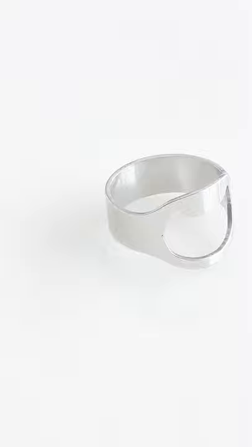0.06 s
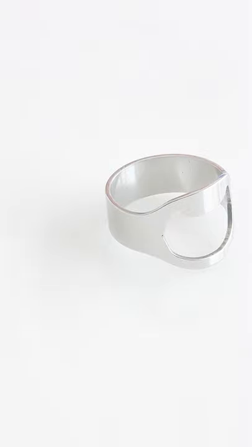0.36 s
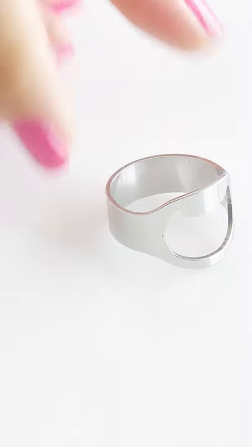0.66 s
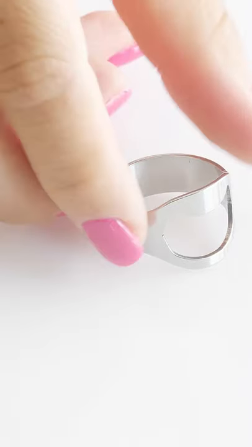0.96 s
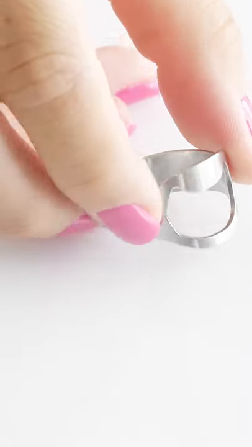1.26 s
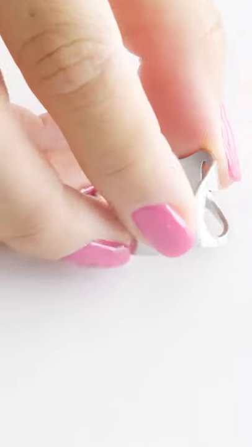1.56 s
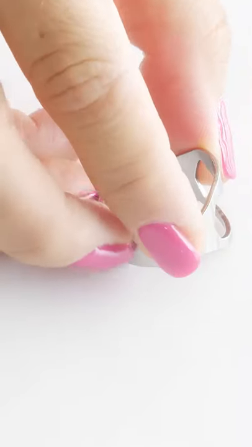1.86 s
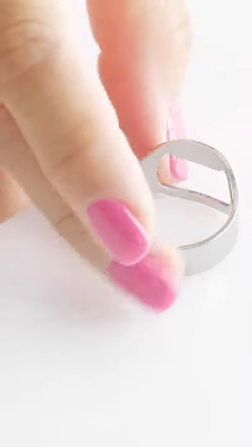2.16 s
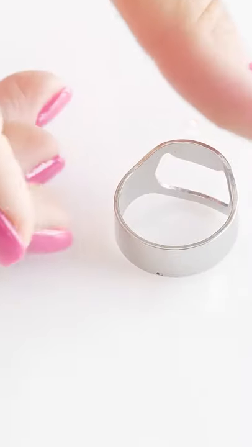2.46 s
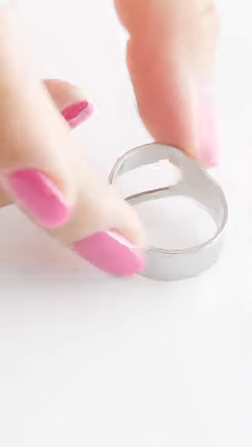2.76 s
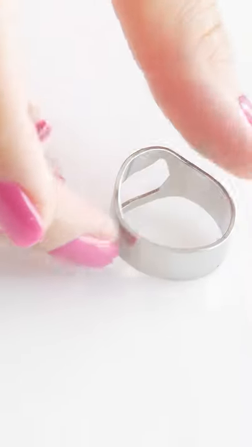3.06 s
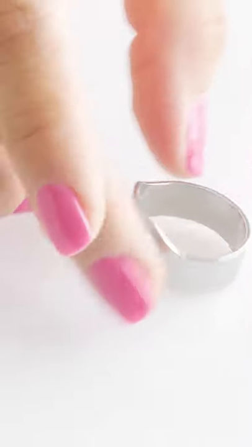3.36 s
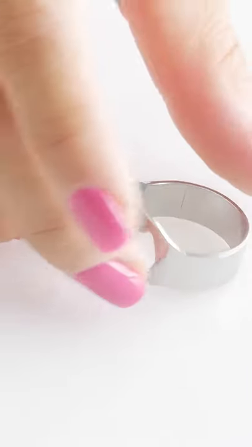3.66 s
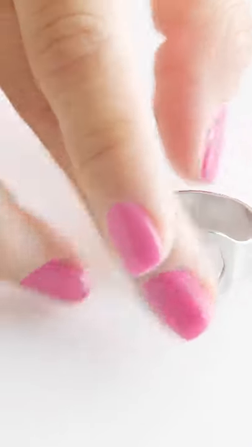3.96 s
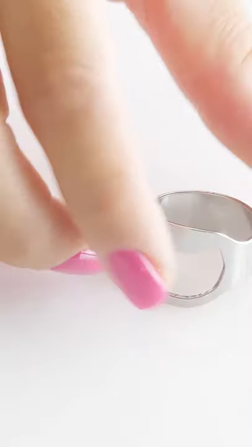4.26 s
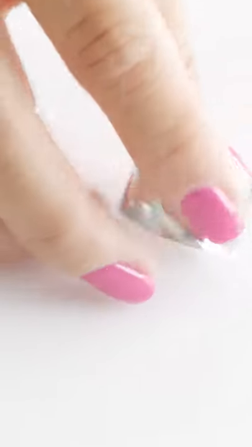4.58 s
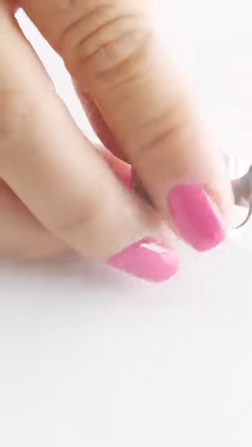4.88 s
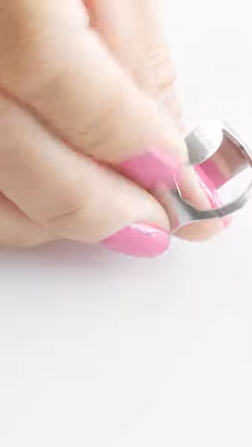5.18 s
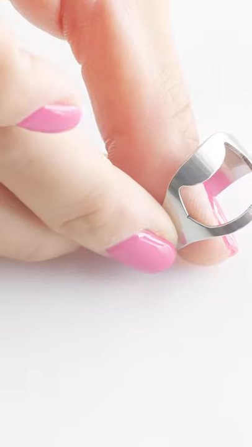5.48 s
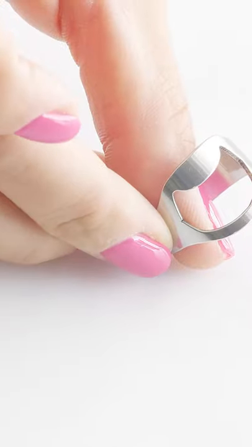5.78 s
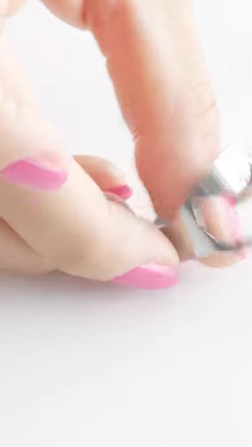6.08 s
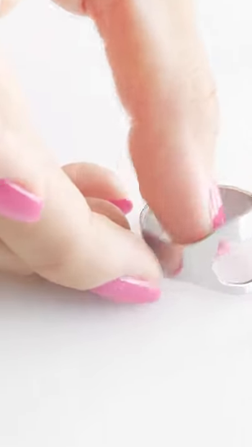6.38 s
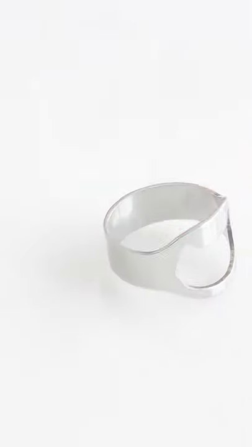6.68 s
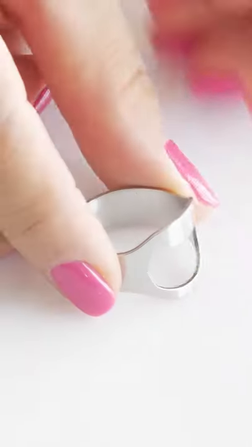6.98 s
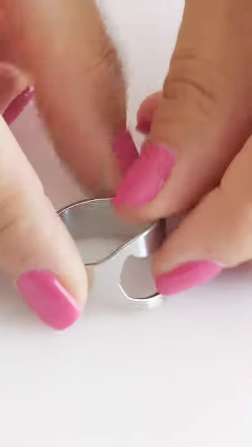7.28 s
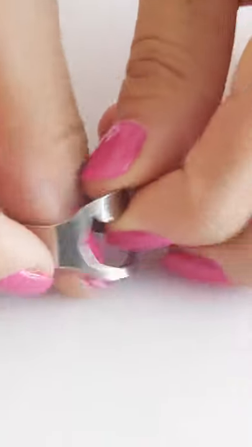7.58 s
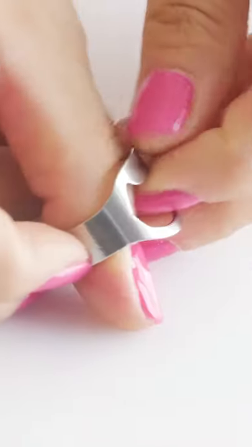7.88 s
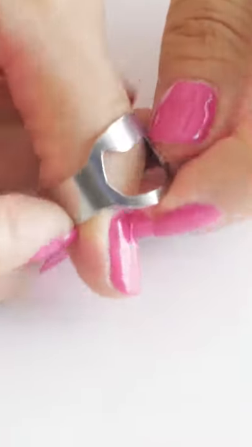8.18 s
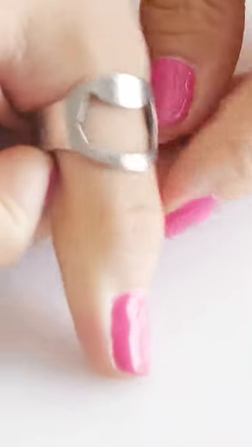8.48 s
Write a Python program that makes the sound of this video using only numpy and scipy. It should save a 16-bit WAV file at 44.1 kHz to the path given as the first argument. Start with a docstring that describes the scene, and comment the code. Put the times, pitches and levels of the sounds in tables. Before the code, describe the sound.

In a small room, close to a hard table, a steel ring is nudged about with scattered light knocks and faint scrapes. It rocks from edge to edge in quick runs of taps, knocks a few times more loudly, then drops with a short, bright clatter and wobbles. Fingernails click against it at the end, with soft bumps of the hands, over a faint low hum.

```python
"""A small room, close to a hard table top, where a steel ring is nudged about and rocks from edge to edge.
It is tipped up, knocks, drops flat with a short clatter, then is pushed onto a finger with nail clicks
and soft bumps of the hand. Knocks and scrapes sound through bending waves in the table; the steel adds
a brief, bright ring and skin a soft hiss. A low hum, faint whines and room noise lie beneath."""
import sys
import numpy as np
from scipy import signal
from scipy.fft import rfft, irfft
from scipy.io import wavfile

SR = 44100
rng = np.random.default_rng(int(sys.argv[2]) if len(sys.argv) > 2 else 0)


def inscribe(sig):
    """Save sig as 16-bit PCM at rate SR to the path in sys.argv[1].

    A 1-D sig is mono; a 2-D sig holds one channel per row.
    Samples are clipped to [-1, 1] before scaling.
    """
    pcm = np.round(np.clip(np.atleast_2d(sig).T, -1, 1) * 32767)
    wavfile.write(sys.argv[1], SR, pcm.astype(np.int16))


N = 381024
TIME = np.arange(N) / SR

# the ring hits the table: (time [s], blow [dB], hardness as corner [Hz], resonance of the spot [Hz],
# free ringing of the steel [dB re blow])
RING_HITS = [(1.2585, -16.5, 2260, 1410, -40), (1.3897, -11, 2620, 1080, -40),
             (1.7244, -10, 3600, 1270, -40), (1.9886, -6.5, 3590, 950, -40), (2.6727, -11, 2608, 1510, -40),
             (3.416, -7, 1810, 1480, -40), (3.8280, -9, 2180, 990, -40), (3.9698, -24, 1806, 1305, -40),
             (4.4433, -8, 2007, 1043, -40), (4.8432, -15.5, 1500, 936, -23), (5.045, 6.5, 4200, 1663, -42),
             (5.1378, 1.5, 2330, 1440, -42), (5.297, 8.5, 2550, 1430, -40), (6.1763, 11, 4380, 1332, -11),
             (6.1914, 4.5, 4100, 1560, -27), (6.2029, 3, 4300, 950, -9), (6.2117, -4.5, 5500, 1350, 5),
             (6.223, 14, 15200, 1130, -2.5), (6.231, -1, 6000, 2530, -7), (6.2408, -16, 12000, 7900, -17),
             (6.2427, -15, 9000, 1310, -30), (6.2519, -4, 9900, 1300, -16), (7.0518, -11, 3000, 1020, -40),
             (7.7373, -11.5, 2604, 1220, -44), (8.1574, -14.5, 1560, 755, -34),
             (8.4215, -13.5, 1670, 1150, -45)]


def undb(db):
    """Decibels to gain."""
    return 10 ** (np.asarray(db) / 20)


def unit(x):
    """Scale to rms 1."""
    return x / np.std(x)


def add(track, s, sound):
    """Mix a sound into a track at time s."""
    i = int(s * SR)
    track[i:i + len(sound)] += sound[:N - i]


def through(x, response):
    """Pass a track through an impulse response."""
    return signal.fftconvolve(x, response)[:N]


def band(x, lo_hz, hi_hz, order=2):
    """Causal band-pass."""
    sos = signal.butter(order, [lo_hz, min(hi_hz, .45 * SR)], "band", fs=SR, output="sos")
    return signal.sosfilt(sos, x)


def noise(spectrum):
    """Noise of rms 1, coloured by (frequency [Hz], level [dB]) points."""
    hz, db = np.transpose(spectrum)
    bins = np.maximum(np.arange(N // 2 + 1) * SR / N, 1)
    colour = undb(np.interp(np.log(bins), np.log(hz), db))
    return unit(irfft(rfft(rng.standard_normal(N)) * colour, N))


def swell(s, half_s, db):
    """Bell-shaped envelope centred on time s."""
    return undb(db) * np.exp(-.5 * ((TIME - s) / half_s) ** 2)


def ring_down(modes):
    """Struck modes die away as damped sines."""
    t = np.arange(SR // 3) / SR
    return sum(undb(db) * np.sin(2 * np.pi * hz * t) * np.exp(-np.log(1000) * t / t60)
               for hz, db, t60 in modes)


def contact(db, corner_hz):
    """Force pulse of one contact: the softer it is, the longer it lasts."""
    k = np.arange(1, 257)
    force = k * np.exp(-2 * np.pi * corner_hz * k / SR)
    return undb(db) * force / force.sum()


def spot(force, hz, boost_db, width_hz):
    """Where a blow lands decides which of the table's modes it favours."""
    force = np.pad(force, (0, SR // 40))
    favoured = band(force, max(hz - width_hz / 2, 100), hz + width_hz / 2, order=1)
    return force + undb(boost_db) * favoured


def room_tone(flutter_db=2, octave_db=-14, waver_hz=4, low_db=-62, air_db=-55.5):
    """The bed: a wavering hum with its octave, thin whines, low room noise and hiss."""
    # the hum's wandering course: (time [s], pitch [Hz], level [dB])
    hum_course = [(0.1, 66.1, -56), (0.21, 64.4, -49), (1.03, 69.5, -54.5), (1.18, 72.6, -57),
                  (1.21, 75.2, -71), (1.41, 74, -50.5), (1.53, 75.3, -58.5), (1.96, 74.6, -48.5),
                  (2.11, 77.6, -71), (2.15, 77.4, -52.5), (2.36, 76.5, -49.5), (2.56, 78.5, -66),
                  (2.61, 77.8, -51), (3.61, 78.8, -55), (3.71, 78.6, -64), (3.83, 76.2, -50),
                  (3.98, 73.9, -67), (4.0, 74.7, -53.5), (4.87, 74.8, -58.5), (4.95, 74.5, -56),
                  (5.5, 77.5, -53), (5.88, 76, -64), (6.7, 75.5, -57.5), (7.1, 75, -62)]
    # faint whines: (pitch [Hz], level [dB])
    whine_tones = [(576.0, -72), (2789, -71), (2934, -78.5)]
    # colour of the room noise and hiss: (frequency [Hz], relative density [dB])
    air_colour = [(60, -12), (110, -23), (145, -3.5), (200, -8), (300, -12), (450, -14.5), (700, -15.5),
                  (880, -13.5), (1100, -19.5), (1600, -21.5), (3400, -22.5), (8000, -24.5), (13000, -28),
                  (16000, -33.5)]
    s, hz, db = np.transpose(hum_course)
    flutter = flutter_db * unit(band(rng.standard_normal(N), 1.5, 6.2))
    phase = 2 * np.pi * np.cumsum(np.interp(TIME, s, hz)) / SR
    hum_level = np.sqrt(2) * undb(flutter + np.interp(TIME, s, db))
    hum = hum_level * (np.sin(phase) + undb(octave_db) * np.sin(2 * phase))
    whines = 0
    for hz, db in whine_tones:
        drift = waver_hz * unit(band(rng.standard_normal(N), 1, 5.7, order=1))
        whines += np.sqrt(2) * undb(db) * np.sin(2 * np.pi * np.cumsum(hz + drift) / SR)
    low = undb(low_db) * unit(band(rng.standard_normal(N), 42, 139))
    return hum + whines + low + undb(air_db) * noise(air_colour)


def swells_and_rubs(spread=1.5):
    """Faint hisses and a soft, low swell of room noise near the start; later, skin rubs steel and table."""
    # swells of band noise: (mid time [s], half length [s], level [dB], band centre [Hz])
    swells = [(0.163, 0.014, -50.5, 8100), (0.164, 0.022, -54, 3960), (0.36, 0.14, -62, 270),
              (0.446, 0.022, -60.5, 4940), (2.065, 0.037, -56.5, 320), (2.842, 0.022, -55, 350),
              (4.892, 0.13, -58, 4000), (5.244, 0.3, -61, 7780), (6.132, 0.0035, -50.5, 3456),
              (6.956, 0.021, -56.5, 6204), (6.966, 0.014, -49, 338), (7.189, 0.013, -49.5, 400),
              (7.32, 0.026, -61, 5970), (7.667, 0.056, -54.5, 382.5), (7.897, 0.053, -66, 6440),
              (8.44, 0.028, -50, 400)]
    grit = rng.standard_normal(N)
    return sum(unit(band(grit, hz / spread, hz * spread)) * swell(s, half_s, db)
               for s, half_s, db, hz in swells)


def table_response(size=16384):
    """The top is a plate: low bending waves travel slower, so each arrival is a quick downward chirp."""
    # how the top radiates a sharp blow: (frequency [Hz], relative level [dB])
    radiation = [(60, -52), (240, -4), (330, -9), (480, -4), (750, -2), (1000, -1), (1600, 1), (2500, 0),
                 (3800, 3), (6000, 0), (7000, -2), (8200, 0.5), (9800, -4), (11700, -1), (16000, -11.5)]
    # bending waves, direct and back from the edges:
    # (travel time at 1 kHz [s], relative level [dB], treble loss corner [Hz])
    wave_paths = [(.0008, 0, 30000), (.0025, -6, 4500), (.0043, 0, 3600), (.0088, -11, 2600),
                  (.014, -20, 1800)]
    # standing waves of the top: (frequency [Hz], relative level [dB], t60 [s])
    top_modes = [(597.3, -38, 0.15), (725, -64, 0.024), (913.4, -33, 0.06), (1097, -34.5, 0.12),
                 (1470, -38, 0.036), (2360, -42, 0.065), (2717, -40, 0.11)]
    hz = np.maximum(np.arange(size // 2 + 1) * SR / size, 1)
    points_hz, db = np.transpose(radiation)
    cepstrum = irfft(np.log(undb(np.interp(np.log(hz), np.log(points_hz), db))))
    colour = np.exp(rfft(np.r_[cepstrum[0], 2 * cepstrum[1:size // 2]], size))  # minimum phase
    waves = 0
    for travel_s, path_db, loss_hz in wave_paths:
        phase = 4 * np.pi * travel_s * np.sqrt(1000 * hz)
        waves += undb(path_db) * np.exp(-1j * phase) / (1 + (hz / loss_hz) ** 2)
    standing = 1 + 1j * rfft(ring_down(top_modes), size)
    response = irfft(colour * waves * standing)[:size // 2]
    return response / np.linalg.norm(response)


def rim_scrapes(table, grain_db=3.0, grain_samples=32):
    """Dense tiny slips of the rim shake the table top."""
    # the rim drags: (mid time [s], half length [s], level [dB])
    drags = [(1.098, 0.0058, -52.5), (1.553, 0.026, -59), (1.993, 0.0051, -43), (2.214, 0.032, -61),
             (2.672, 0.011, -42), (2.857, 0.022, -52), (3.346, 0.034, -53.5), (3.523, 0.0055, -44),
             (3.959, 0.015, -49), (4.509, 0.0054, -53), (4.656, 0.04, -54), (7.2, .025, -62),
             (7.455, 0.0095, -50.5), (7.916, 0.0031, -44.5)]
    roughness = np.repeat(rng.exponential(size=N // grain_samples + 1), grain_samples)[:N]
    slips = rng.standard_normal(N) * undb(grain_db * roughness)
    scraping = unit(through(band(slips, 770, 1540, order=1), table))
    return scraping * sum(swell(*drag) for drag in drags)


def ring_strikes(table):
    """Each blow knocks on the table; the steel rings out briefly when the fingers let it go."""
    # bending modes of the ring: (frequency [Hz], relative level [dB], t60 [s])
    steel_modes = [(4847, -33.5, 0.074), (6210, -29, 0.016), (11680, -45, .05), (13080, -53, 0.16),
                   (13200, -47, .06)]
    on_table, on_steel = np.zeros(N), np.zeros(N)
    lags = rng.uniform(0, 0.00027, len(RING_HITS))  # blows catch the ringing steel at a chance phase
    for (s, db, corner_hz, spot_hz, free_db), lag in zip(RING_HITS, lags):
        add(on_table, s, spot(contact(db, corner_hz), spot_hz, boost_db=-1, width_hz=450))
        add(on_steel, s + lag, contact(db + free_db, corner_hz=18000))
    return through(on_table, table) + through(on_steel, ring_down(steel_modes))


def table_thumps(share_db=-44):
    """A share of every blow makes the whole table sway with a low thump."""
    # sway of the table: (frequency [Hz], relative level [dB], t60 [s])
    sway_modes = [(37.6, -1.5, 0.25), (60, 3.5, 0.18), (107.4, -9, 0.25), (140, -22, 0.37)]
    force = np.zeros(N)
    for s, db, *_ in RING_HITS:
        add(force, s, contact(db + share_db, corner_hz=300))
    return through(force, ring_down(sway_modes))


def ring_rocking(table, usual_corner_hz=1900, rebound_gain=.35):
    """The two edges land in turn, the swings quickening; each ends in a soft tap and a tiny rebound."""
    # bouts of rocking: (start [s], end [s], taps [count], shortening per swing [s], second edge lag [s],
    # base level [dB], first spot [Hz], last spot [Hz], hardness corner of edge one [Hz], edge two [Hz])
    bouts = [(2.947, 3.166, 5, 0.00033, -.0039, -8.5, 1094, 993, 1890, 1940),
             (3.474, 3.815, 7, 0.00083, .00245, -8.5, 816, 1010, 2520, 2180),
             (4.048, 4.398, 8, 0.0003, .0003, -11.5, 1150, 1040, 2490, 1620),
             (6.468, 6.982, 10, 0.00024, 0.0032, -9, 970, 930, 1210, 1570)]
    force = np.zeros(N)
    for start_s, end_s, taps, quicken_s, late_s, db, first_hz, last_hz, *edges_hz in bouts:
        turns = np.arange(taps)
        uneven = late_s * (turns % 2) - quicken_s * turns ** 2 / 2
        times = np.linspace(start_s, end_s - uneven[-1], taps) + uneven
        for k, s, spot_hz in zip(turns, times, np.linspace(first_hz, last_hz, taps)):
            corner_hz = edges_hz[k % 2]
            fullness = (usual_corner_hz / corner_hz) ** 0.7  # the softer edge lands duller and fuller
            tap = contact(db, corner_hz) * fullness
            rebound_s = rng.uniform(.0012, .003)
            add(force, s, spot(tap, spot_hz, boost_db=7, width_hz=110))
            add(force, s + rebound_s, rebound_gain * tap)
    return through(band(force, 640, 4300), table)  # too light to stir the low modes


def nail_clicks(table, decay_s=0.00051):
    """A nail snaps over the rim: a bright click in the air, a dull knock into the table."""
    # nail on steel: (time [s], click peak [dB], knock [dB], knock hardness as corner [Hz])
    snaps = [(4.0618, -43, -11, 1500), (7.2893, -25, -9.5, 1495), (7.4489, -50, -11, 1216),
             (7.6388, -22.5, 4.5, 758), (7.875, -40, -10.5, 1510), (7.912, -29, -11, 1590),
             (8.0743, -43, -12.5, 1150), (8.4626, -34, -12, 996)]
    knocks, clicks = np.zeros(N), np.zeros(N)
    t = np.arange(SR // 100) / SR
    for s, click_db, knock_db, corner_hz in snaps:
        burst = rng.standard_normal(len(t)) * np.exp(-t / decay_s)
        click = band(burst, 1630, 6800, order=3)
        add(clicks, s, undb(click_db) * click / np.abs(click).max())
        add(knocks, s, contact(knock_db, corner_hz))
    return clicks + through(knocks, table)


def hand_bumps(attack_s=0.03, release_s=0.049, rest_from_s=7.17, rest_db=-55.5):
    """The weight of resting hands makes the table rumble; each press builds quickly and eases off."""
    # the hands press down as they shift: (time [s], level [dB])
    presses = [(7.19, -46.5), (7.5, -49), (7.65, -40.5), (7.96, -46), (8.09, -46), (8.41, -41.5),
               (8.5, -40)]
    # colour of the table's rumble: (frequency [Hz], relative density [dB])
    rumble_colour = [(13, -33), (22, 0), (43, -4.5), (81, -2), (146, -7), (178, -26), (300, -17),
                     (390, -64), (660, -120)]
    power = undb(rest_db) ** 2 * (TIME > rest_from_s)
    for s, db in presses:
        press = undb(db) * np.exp(-np.maximum((s - TIME) / attack_s, (TIME - s) / release_s))
        power += press ** 2
    return noise(rumble_colour) * np.sqrt(power)


def room_reverb(x, predelay_s=0.0007, build_s=0.018):
    """Diffuse echoes build up within milliseconds and die away soonest in the high treble."""
    # the small room's echoes: (band [Hz], level [dB], t60 [s])
    echo_bands = [(60.23, -15, 0.34), (198, 1, 0.41), (447, -0.5, 0.35), (980, -3.5, 0.39),
                  (2000, -6, 0.46), (3931, -7, 0.45), (7700, -12.5, 0.38), (15000, -25, 0.28)]
    t = np.arange(SR // 2) / SR
    hz, db, t60 = np.transpose(echo_bands)
    log_bins = np.log(np.maximum(np.arange(len(t) // 2 + 1) * SR / len(t), 1))
    white = rfft(rng.standard_normal(len(t)))
    onset = np.clip((t - predelay_s) / build_s, 0, 1)
    response = 0
    for k, share in enumerate(np.eye(len(hz))):
        fade = onset * np.exp(-np.log(1000) * t / t60[k])
        echoes = irfft(white * np.interp(log_bins, np.log(hz), share), len(t))
        response += undb(db[k]) * echoes * fade / np.linalg.norm(fade)
    return through(x, response)


def scene(rocking_send_db=-2):
    """Ring and nails play the one table top and the room answers; both channels carry the same mix."""
    table = table_response()
    strikes = ring_strikes(table) + table_thumps()
    nails = nail_clicks(table)
    taps = ring_rocking(table)
    foreground = strikes + nails + rim_scrapes(table) + swells_and_rubs()
    echoes = room_reverb(foreground + undb(rocking_send_db) * taps)
    return np.tile(foreground + taps + echoes + hand_bumps() + room_tone(), (2, 1))


def record(dry):
    """The sound opens after a moment of silence, clips at full scale and loses its very top."""
    open_s, top_hz = .078, 15900
    opened = np.clip(dry, -1, 1) * (TIME > open_s)
    return signal.sosfilt(signal.ellip(10, .2, 70, top_hz, fs=SR, output="sos"), opened)


dry = scene()
out = record(dry)
inscribe(out)
```